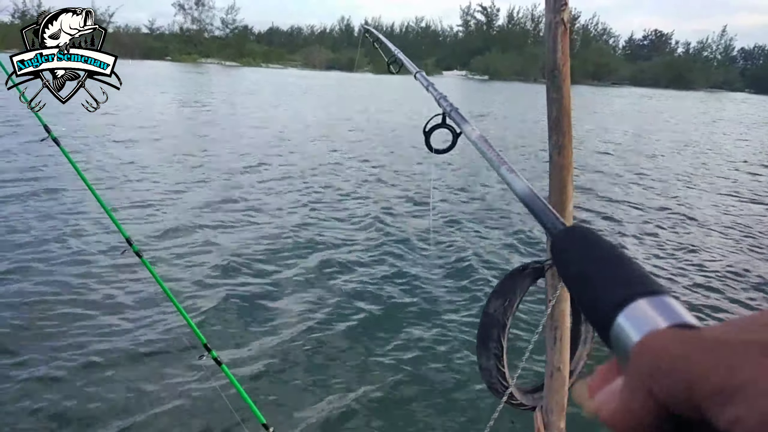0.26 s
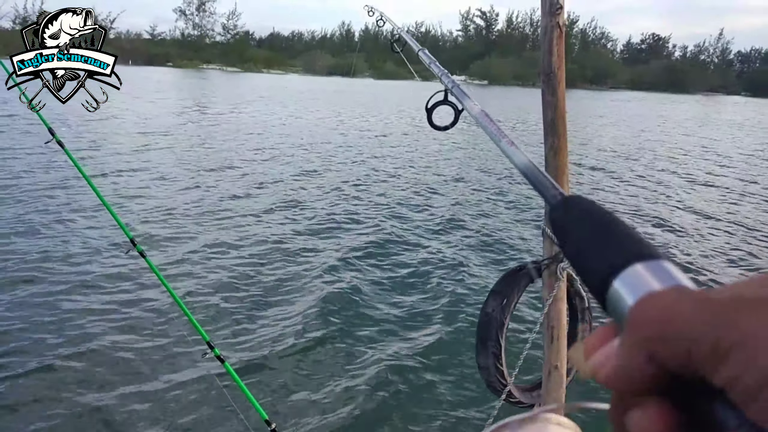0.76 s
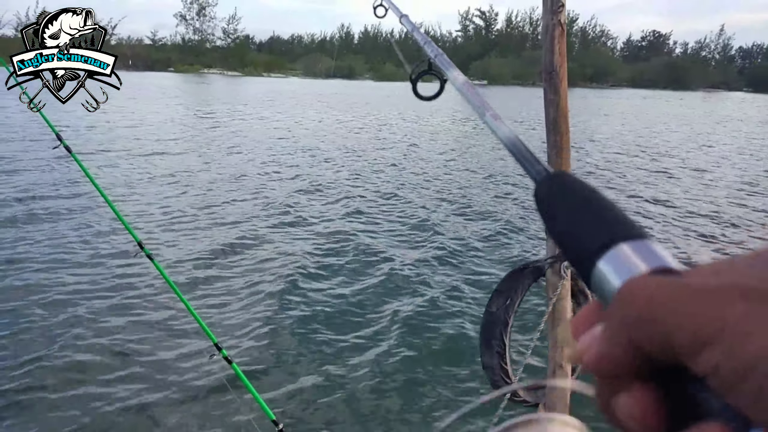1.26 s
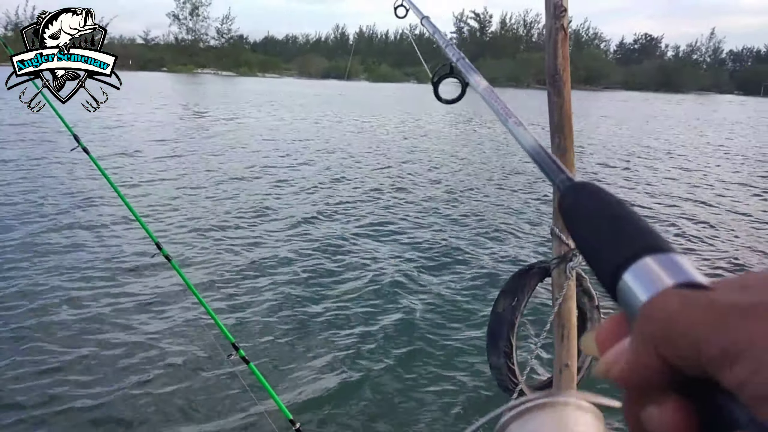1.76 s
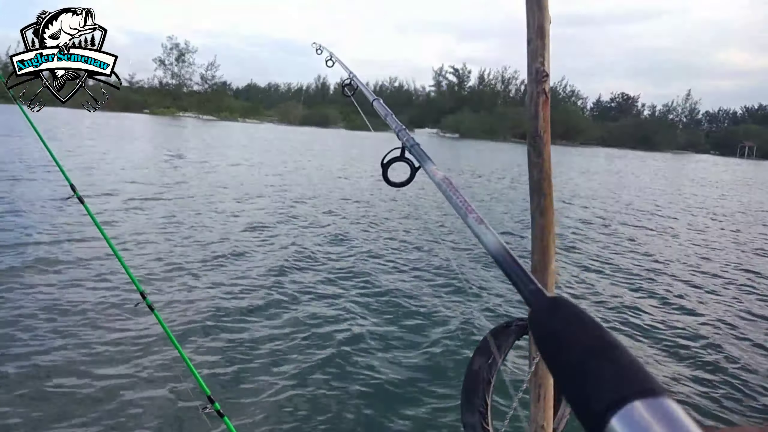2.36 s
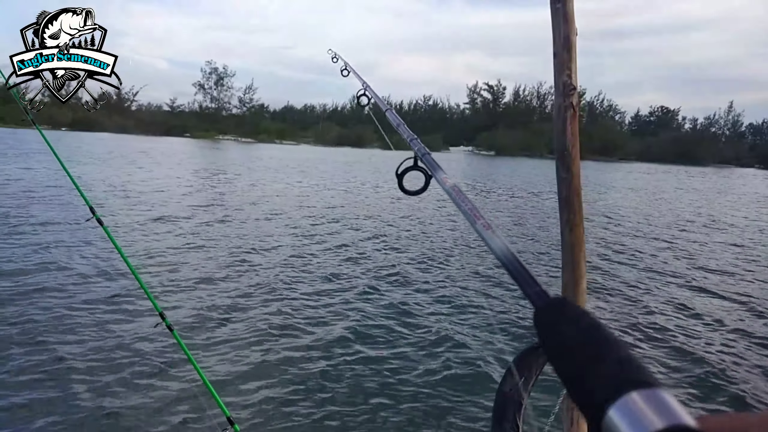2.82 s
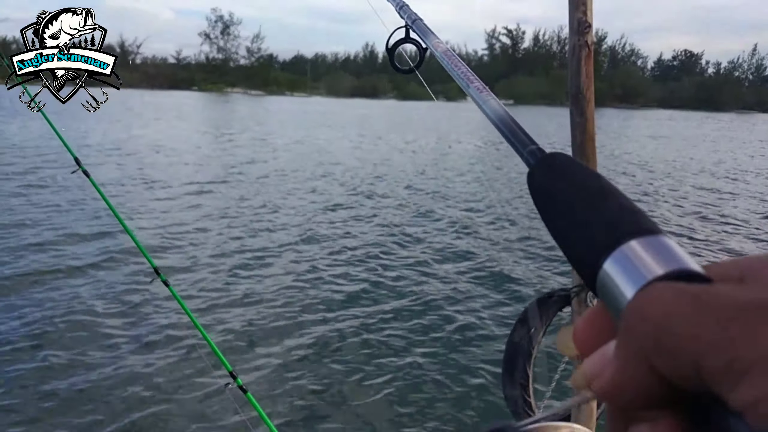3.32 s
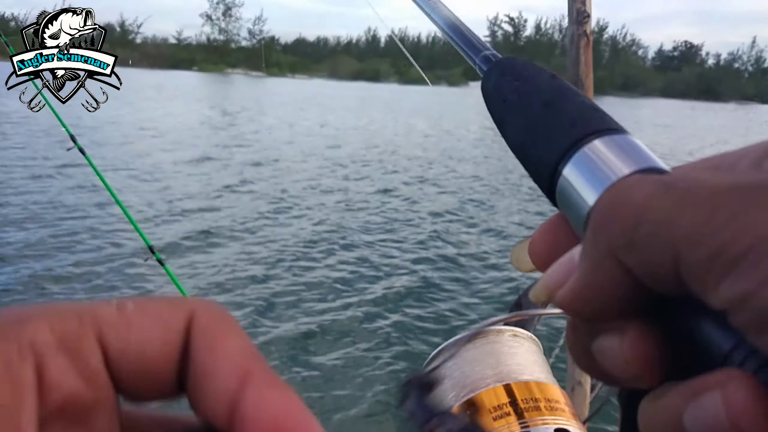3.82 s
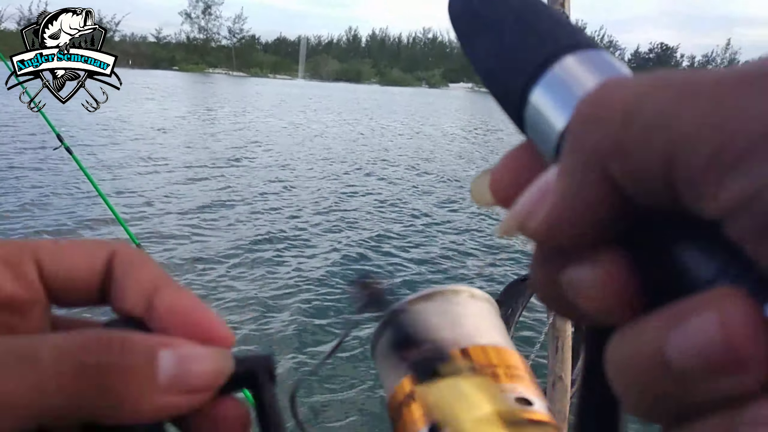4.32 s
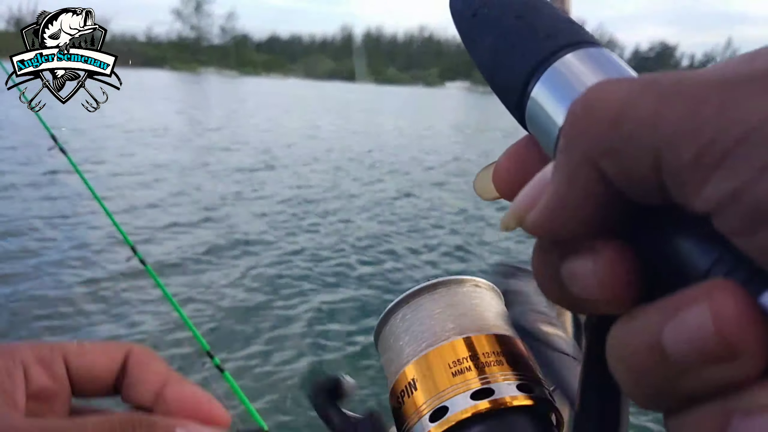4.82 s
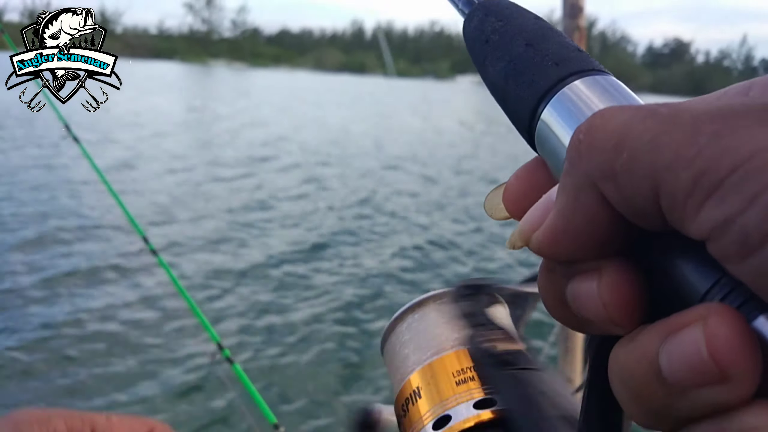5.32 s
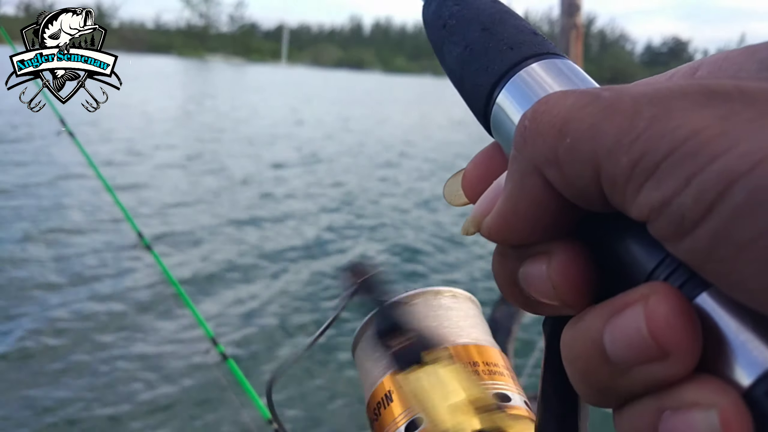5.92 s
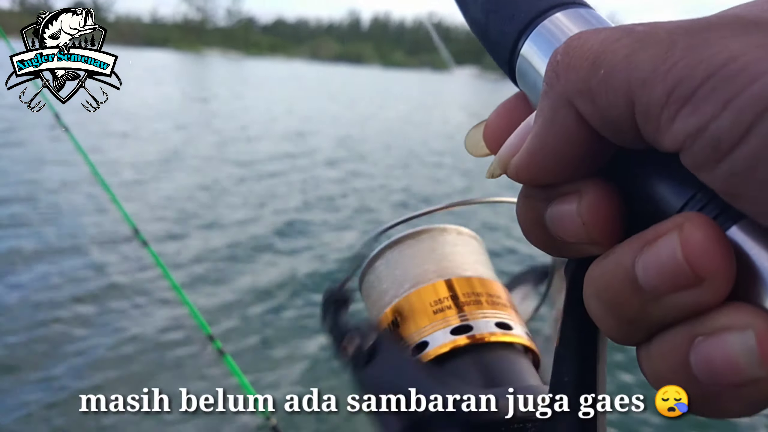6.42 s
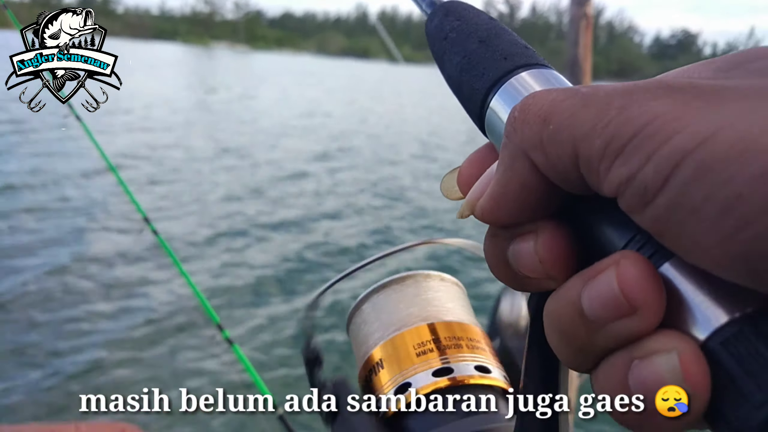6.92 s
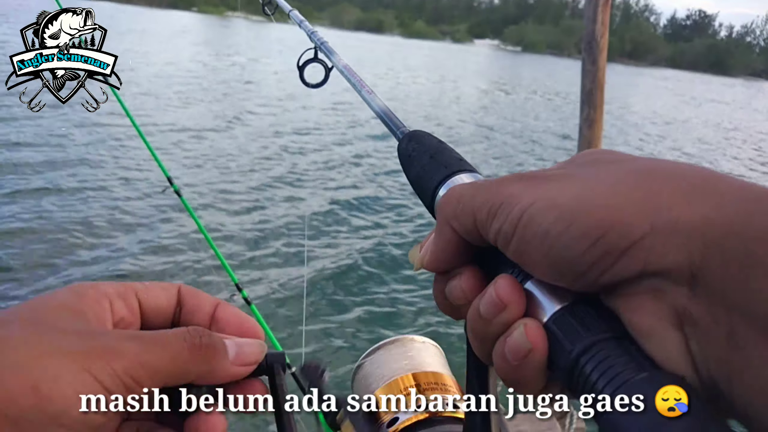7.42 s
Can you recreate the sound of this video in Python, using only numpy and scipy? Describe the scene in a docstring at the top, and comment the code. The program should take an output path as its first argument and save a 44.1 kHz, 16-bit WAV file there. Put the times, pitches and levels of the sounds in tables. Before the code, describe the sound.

An angler winds a spinning reel close to a stereo microphone outdoors. The gears give a soft, narrow whir that swells twice per crank turn, about one turn a second, with sharp irregular ticks and thin line rasp. Wind thuds low, mostly on the right. Small waves hiss below, a few bubbles plop, and faint arched whistles come from afar in the later part. The whir weakens near the end.

```python
"""A spinning reel is wound by an angler on a wooden jetty in a breeze, close to a two-port microphone.
Its gears whir (narrow noise) with a push and a return per crank turn; line and rotor tick and rasp (struck modes).
Wind buffets the right port most: lumpy low noise and decaying low knocks.
Small waves wash below (coloured hiss, droplets) and trapped bubbles plop (gliding, decaying sines).
Faint arched whistles come from afar: hoarse tones sliding up and down."""
import sys
import numpy as np
from scipy import signal
from scipy.fft import rfft, irfft, next_fast_len
from scipy.io import wavfile
from scipy.ndimage import uniform_filter1d

SR = 44100
rng = np.random.default_rng(int(sys.argv[2]) if len(sys.argv) > 2 else 0)


def generate_wav(signal):
    """Clip the signal to [-1, 1] and save it as 16-bit WAV at the path in sys.argv[1]."""
    frames = np.transpose(np.atleast_2d(signal))
    scaled = np.clip(frames, -1, 1) * 32767
    pcm = np.round(scaled).astype(np.int16)
    wavfile.write(sys.argv[1], SR, pcm)


N = 338335

# modes of the reel: [f/Hz, relative left level/dB, relative right level/dB, t60/s]
MODES = [(2950, -9.5, -7, 0.004), (4013, -11.5, -10, 0.0087), (4550, -7, -8, 0.0021),
         (5740, -5, -5, 0.0044), (7200, -10.5, -8.5, 0.0048), (8470, 0.5, 3, 0.0031),
         (9870, 10.5, 4.5, 0.00092), (12060, 0.5, -11, 0.0026), (14400, -5.5, -18, 0.0017)]
HISS_TOP_HZ = 15600


def reel():
    """Whir, rasp and ticks add; scuffs of line over the roller swell the rubbing power."""
    # clear ticks of line and rotor: [t/s, left peak level/dB, brightest f/Hz, left over right beyond 14 dB/dB]
    clear_ticks = [(0.1431, -39, 9500, 3), (0.158, -32, 6000, 0), (0.232, -19.5, 11700, -6),
                   (0.245, -33, 10000, 0), (0.4314, -35, 12000, 2), (0.571, -24, 9000, -10),
                   (0.5882, -20.5, 8400, -4), (0.633, -33, 11000, -5), (0.6734, -28, 11500, 0),
                   (0.855, -26, 9700, 0), (1.044, -30, 12000, 3), (1.0562, -17.5, 11200, -7),
                   (1.0886, -22, 9200, 3), (1.1308, -30, 10300, 6), (1.1613, -30, 11400, 6),
                   (1.2065, -26, 10200, -10), (1.2569, -22.5, 10300, -9), (1.441, -33, 8000, 0),
                   (1.5758, -28, 9400, 2), (1.644, -29, 10500, 4), (1.6789, -21.5, 7940, -11),
                   (1.7764, -15, 11200, -6), (1.979, -29, 12000, 3), (2.064, -28, 9650, -23),
                   (2.077, -10, 9200, 15), (2.085, -27, 10500, 4), (2.251, -39, 9500, 3),
                   (2.26, -22, 10200, 8), (2.292, -25, 10700, 17), (2.376, -32, 11500, 4),
                   (2.391, -32, 11700, -3), (2.431, -39, 10500, 3), (2.463, -22, 9800, -7),
                   (2.5167, -25, 9000, 2), (2.5652, -26.5, 8950, -9), (2.612, -27.5, 10500, 3),
                   (2.62, -33, 8000, 1), (2.6878, -30, 9100, 0), (2.697, -37, 10500, 3),
                   (2.9622, -26.5, 8900, 1), (3.0619, -28, 11500, 0), (3.0864, -28.5, 9500, 3),
                   (3.1858, -13.5, 11100, -7), (3.1986, -27, 9300, 11), (3.2764, -25.5, 10000, -7),
                   (3.2929, -26.5, 9700, 4), (3.355, -23.5, 9800, -8), (3.568, -24.5, 8600, 10),
                   (3.581, -24, 7600, 8), (3.6518, -15, 9700, -10), (3.753, -28, 9300, -2),
                   (3.9199, -25, 10300, -7), (4.0469, -17, 10200, -4), (4.0535, -29, 9500, 3),
                   (4.0625, -26, 9500, 3), (4.2011, -26, 4340, -19), (4.2188, -25.5, 11200, 0),
                   (4.383, -36, 10500, 3), (4.391, -20, 9500, 2), (4.4115, -27, 7000, 10),
                   (4.4169, -23, 9000, 6), (4.482, -28, 12100, 0), (4.5117, -16.5, 10400, 1),
                   (4.5244, -16, 9700, -4), (4.6065, -13, 11600, -5), (4.6175, -35, 9800, 4),
                   (4.672, -21, 9900, -9), (4.6957, -33, 10400, 5), (4.7235, -22.5, 9350, 15),
                   (4.8075, -27, 7600, 2), (4.867, -26, 9800, 7), (4.905, -29, 10400, 14),
                   (4.968, -11.5, 10100, -7), (4.9906, -13, 11180, 1), (5.036, -27, 11000, 0),
                   (5.0458, -23.5, 5100, 19), (5.0975, -24, 4100, 20), (5.2395, -30, 9950, 3),
                   (5.2547, -21.5, 11200, -4), (5.304, -25, 8900, -4), (5.3446, -14, 10600, -5),
                   (5.3676, -17.5, 10000, 3), (5.5707, -28, 9000, -24), (5.6123, -22.5, 10900, 18),
                   (5.8282, -14.5, 11900, -7), (5.897, -29, 8100, 6), (6.0997, -26, 10000, 4),
                   (6.1186, -29, 4330, -14), (6.1253, -20.5, 9400, 11), (6.1318, -20.5, 10500, 6),
                   (6.153, -31, 9500, 2), (6.2159, -26.5, 9100, 11), (6.2335, -24.5, 9900, -13),
                   (6.316, -25, 9650, -4), (6.329, -30, 12000, 4), (6.3503, -11, 10600, 4),
                   (6.417, -32, 11000, 1), (6.4377, -12.5, 9400, 19), (6.4398, -19, 9500, -3),
                   (6.6453, -30, 10600, 6), (6.6767, -32, 9500, 5), (6.7971, -11, 8900, 9),
                   (6.823, -22, 9450, 7), (6.9686, -37, 11500, 7), (7.001, -23, 10600, 4),
                   (7.259, -23, 9800, 17), (7.3453, -28, 10200, 9), (7.3584, -24, 12000, -1),
                   (7.4733, -21.5, 9600, 15), (7.4891, -35, 8650, -11)]
    # steady rubbing drive: [t/s, hiss in the body level/dB, rasp of the line level/dB]
    rubbing_drive = [(0, -63.5, -65.5), (0.3, -66.5, -69.5), (0.37, -63, -64.5), (0.78, -60.5, -62),
                     (0.92, -67, -64.5), (1.15, -59.5, -58.5), (1.4, -64.5, -66), (2.1, -63.5, -65),
                     (2.75, -67, -68), (3.5, -61, -60.5), (4.2, -60.5, -57), (5.0, -61, -61.5),
                     (5.6, -64, -67), (5.95, -59.5, -62), (6.15, -64.5, -67), (6.36, -60, -61),
                     (6.55, -66.5, -71.5), (6.8, -60, -69.5), (6.95, -65, -64), (7.15, -67.5, -67),
                     (7.67, -66, -61)]
    # short scuffs: [centre t/s, level/dB]
    scuff_rows = [(.03, -57), (.14, -51), (0.228, -60), (0.768, -58), (1.08, -53.5), (1.45, -59),
                  (1.569, -53), (1.67, -55.5), (1.962, -57.5), (2.071, -54.5), (2.48, -58.5),
                  (2.612, -57.5), (3.06, -54.5), (3.178, -54), (3.93, -60), (4.041, -54.5), (4.4, -49.5),
                  (4.89, -57), (5.261, -53), (5.37, -52.5), (5.582, -60.5), (5.788, -56.5), (5.9, -57),
                  (6.24, -55), (6.331, -50), (6.438, -54), (6.569, -59), (6.66, -59.5), (6.8, -51),
                  (7.49, -57.5)]
    scuff_half_width_s, scuff_in_body_db = 0.016, -12

    body_db, line_db = in_time(rubbing_drive)
    scuff_power = bumps(*np.transpose(scuff_rows), scuff_half_width_s)
    body_power = from_db(2 * body_db) + from_db(2 * scuff_in_body_db) * scuff_power
    line_power = from_db(2 * line_db) + scuff_power
    body_db, line_db = 10 * np.log10(body_power), 10 * np.log10(line_power)
    faint_ticks = ticks(strays(line_db, count=330))
    rubbing = patchy(rasp(body_db, line_db) + faint_ticks)
    return whir(*crank()) + rubbing + ticks(clear_ticks)


def crank():
    """Each turn has a fast push and a slower return; gives the whir's pitch (Hz) and level (dB)."""
    # turns of the crank: [push t/s, push level/dB, return level/dB]
    turns = [(-0.27, -67, -61), (0.72, -56.5, -58.5), (1.632, -54.5, -58.5), (2.65, -59, -59.5),
             (3.662, -54.5, -58), (4.64, -53.5, -58.5), (5.501, -55, -59), (6.501, -58.5, -68),
             (6.833, -62.5, -88), (7.449, -64, -84)]
    push_half_width_s, return_half_width_s, speed_up_half_width_s = 0.18, 0.19, 0.22
    return_share = 0.39  # how far into the turn the return comes
    slow_hz, push_rise_hz, coast_db = 1571, 94.4, -86

    push_s, push_db, return_db = np.transpose(turns)
    turn_s = np.diff(push_s)
    return_s = push_s + return_share * np.append(turn_s, turn_s[-1])
    power = bumps(push_s, push_db, push_half_width_s)
    power = power + bumps(return_s, return_db, return_half_width_s) + from_db(2 * coast_db)
    pitch_hz = slow_hz + push_rise_hz * bumps(push_s, 0 * push_db, speed_up_half_width_s)
    return pitch_hz, 10 * np.log10(power)


def whir(hz, level_db):
    """Gear teeth rub: a narrow band of uneven noise whose centre rises as the crank speeds up."""
    wander_hz = 28
    turning = np.exp(2j * np.pi * np.cumsum(hz + wander_hz * drift(9.15)) / SR)
    flutter_db = 3.2 * drift(20)
    shared = wobble(95)
    left, right = [rms_one((turning * (shared + .45 * wobble(140))).real) for port in range(2)]
    return from_db(level_db + flutter_db) * ports(left, right)


def rasp(body_db, rasp_db):
    """Dense rubbing keeps the modes ringing in patches; those of the gear housing wander in pitch."""
    body_top_hz = 7500  # modes below belong to the gear housing
    pitch_wander = 0.015  # fraction
    out, t = np.zeros((2, N)), np.arange(N) / SR
    rubbing = .5 * rms_one(grains(1500, 4.5)) + .9 * rng.standard_normal((2, N))
    catching_db = 2.5 * drift(45)  # the line catches and slips
    for hz, left_db, right_db, t60_s in MODES:
        in_body = hz < body_top_hz
        drive_db = body_db - 2.5 if in_body else rasp_db - 12.5
        patches_db = 1.5 * drift(25) + catching_db
        rung = ring(from_db(drive_db + patches_db) * rubbing, hz, t60_s)
        warped_t = t - np.cumsum(pitch_wander * drift(6)) / SR * in_body
        out += from_db([[left_db], [right_db]]) * [np.interp(warped_t, t, port) for port in rung]
    high_pass = signal.butter(4, 2100, "high", fs=SR, output="sos")
    return ports(*signal.sosfilt(high_pass, out))


def ticks(rows):
    """A short scatter of touches strikes the modes near its colour; a tiny contact radiates no lows."""
    contact_t20_s = 0.0007
    hz, left_db, right_db, t60_s = np.transpose(MODES)[:, :, None]
    out, t = np.zeros((2, N)), np.arange(round(0.013 * SR)) / SR
    modes = from_db(-60 * t / t60_s) * np.sin(2 * np.pi * hz * t)
    port_db = np.hstack([left_db, right_db]).T
    for s, level_db, bright_hz, pan_db in rows:
        near_db = -12.0 * np.log2(hz[:, 0] / bright_hz) ** 2
        blow_db = port_db + near_db + rng.normal(0, 2.65, (2, len(hz)))
        blows = from_db(blow_db) * rng.choice([-1, 1], len(hz))
        touches = (rng.standard_normal(len(t)) ** 3 * from_db(-20 * t / contact_t20_s))[:160]
        struck = signal.lfilter(touches, 1, blows @ modes)
        band = signal.butter(3, [.68 * bright_hz, HISS_TOP_HZ], "band", fs=SR, output="sos")
        tick = signal.sosfilt(band, struck)
        tick /= np.abs(tick).max(axis=1, keepdims=True)
        i = min(round(s * SR), N - len(t))
        out[:, i:i + len(t)] += from_db([[level_db], [level_db - pan_db - 14.0]]) * tick
    return ports(*out)


def strays(line_db, count):
    """Rows of faint ticks of every colour, bunched where the line rasps hardest."""
    base_db, spread_db, clump_db = -42, 4, 5.0
    chance = np.cumsum(from_db(line_db + clump_db * drift(25)))
    when, size, hue, side = rng.random((count, 4)).T
    s = np.searchsorted(chance / chance[-1], when) / SR
    level_db = base_db - spread_db * np.log(0.033 + size)
    bright_hz = 6500 + 7000 * hue
    pan_db = 3.1 + 50.0 * (side - .5)
    return np.transpose([s, level_db, bright_hz, pan_db])


def ports(left, right):
    """The reel is nearer the right port, so its sound reaches the left a little late."""
    left_lag_s = .00018
    return np.array([np.roll(left, round(left_lag_s * SR)), right])


def wind():
    """Eddies press on each port on their own: lumpy low noise and short pressure knocks."""
    # wind at the ports: [t/s, left level/dB, right level/dB]
    port_levels = [(0, -56, -35), (0.9, -54, -37), (1.4, -56.5, -40), (2.45, -52, -42), (2.8, -59.5, -38.5),
                   (3.3, -53, -38.5), (3.55, -51, -42.5), (4.4, -53, -40.5), (5.1, -51.5, -41.5),
                   (5.9, -54, -39), (6.2, -52, -40), (7.0, -54.5, -41.5), (7.35, -57, -40),
                   (7.67, -54, -41)]
    # strongest buffets: [t/s, drive level/dB, port (0 left, 1 right)]
    buffets = [(0.026, -32, 1), (0.087, -19.5, 1), (0.408, -23, 1), (0.451, -22, 1), (0.531, -24, 1),
               (0.682, -22, 1), (0.858, -19.5, 1), (0.986, -20.5, 1), (2.562, -24.5, 1), (3.3, -21, 1),
               (4.426, -22.5, 1), (4.472, -20, 1), (4.622, -14.5, 0), (4.636, -21, 0), (4.891, -18.5, 1),
               (5.518, -22, 1), (5.565, -24, 1), (5.705, -24, 1), (5.882, -22, 1), (5.948, -21, 1),
               (6.59, -21.5, 1), (6.9, -21, 1), (7.161, -23, 1), (7.258, -31, 1), (7.524, -18.5, 1),
               (7.606, -23.5, 1)]
    # wind spectrum: [f/Hz, relative left level/dB, relative right level/dB]
    spectrum = np.array([(30, -42, -21), (61, -19, -28.5), (115, 1, -14), (179, 10.5, -1), (219, 2, 0.5),
                         (293, 9.5, -6.5), (416, -4.5, -13.5), (756, -3.5, -26.5), (1070, -67, -46),
                         (2500, -51, -81)])

    out = np.zeros((2, N))
    for port, level_db in enumerate(in_time(port_levels)):
        lumps_db = 3.36 * drift(8.3) + 0.15 * drift(2.1)
        eddies = rng.standard_normal(N) * from_db(lumps_db) + 5.75 * grains(110, 3.94)
        out[port] = from_db(level_db) * colour(eddies, spectrum[:, [0, 1 + port]])
    t = np.arange(round(.05 * SR)) / SR
    swell = (t / 0.01) ** 2 * np.exp(2 - 2 * t / 0.0066)
    for (s, level_db, port), (pitch, phase) in zip(buffets, rng.random((len(buffets), 2))):
        cycles = (190 + 50 * pitch) * t + phase
        knock = np.sin(2 * np.pi * cycles) + 0.52 * np.sin(2 * np.pi * 1.458 * cycles)
        i = round(s * SR)
        out[round(port), i:i + len(t)] += (from_db(level_db) * swell * knock)[:N - i]
    return signal.sosfilt(signal.butter(2, 70, "high", fs=SR, output="sos"), out)


def water():
    """Wash and faint small bubbles, plus louder plops: decaying sines, many gliding in pitch."""
    # bubbles and slaps under the planks, and at 4.63 s the low body of a wind knock on the left port: [t/s,
    # level/dB, f/Hz, t60/s, relative pitch rise/(1/s)]
    plop_rows = [(1.195, -31.5, 1020, 0.005, 0), (1.243, -33, 990, 0.031, 0), (4.337, -33, 656, 0.07, 2.5),
                 (4.41, -29, 970, 0.022, -1), (4.63, -27, 374, 0.033, -5), (5.252, -26.5, 855, 0.0033, 0),
                 (6.264, -33.5, 665, 0.016, 3), (7.235, -37, 740, 0.017, -1), (7.244, -24.5, 470, 0.01, -7),
                 (7.258, -32, 595, 0.015, -4), (7.259, -31, 1100, 0.0065, 0),
                 (7.258, -35.5, 309.7, 0.25, 2.5), (7.266, -41.5, 1300, 0.03, -12),
                 (7.349, -50, 870, 0.029, -2), (7.36, -47, 597, 0.18, 1), (7.548, -34, 503, 0.037, -5)]
    small = sum(ring(grains(3.0, 4.0), hz, 14.0 / hz) for hz in np.geomspace(400, 2400, 10))
    plops = small * from_db(-60)
    t = np.arange(round(.11 * SR)) / SR
    uneven = from_db(3.5 * drift(90))  # a bubble in moving water does not ring evenly
    for s, level_db, hz, t60_s, rise in plop_rows:
        i = round(s * SR)
        attack = np.minimum(t / min(.12 * t60_s, .004), 1)
        shape = from_db(level_db - 60 * t / t60_s) * attack * uneven[i:][:len(t)]
        tone = np.sin(2 * np.pi * hz * (t + rise * t * t / 2))
        plops[i:i + len(t)] += (shape * tone)[:N - i]
    return wash() + plops


def wash():
    """Hiss and droplets, partly alike at both ports, swelling slowly."""
    # wash spectrum: [f/Hz, relative level/dB]
    spectrum = [(200, -21), (450, 5.5), (750, -1.5), (1100, -2.5), (2000, -6), (3500, -29.5), (7000, -7),
                (12600, -10), (13200, -14), (15500, -18)]
    # course of the wash: [t/s, level/dB]
    course = [(0, -58), (6.0, -56.5), (7.67, -64)]
    swell_db, droplet_share, alike = 1.5, 0.7, 0.55  # alike: power share of mid
    mid, side = rng.standard_normal((2, N)) + droplet_share * rms_one(grains(900, 4.1))
    out = np.sqrt(alike) * mid + np.sqrt(1 - alike) * side * [[1], [-1]]
    level_db = in_time(course)[0] + swell_db * drift(4.5)
    return from_db(level_db) * patchy(colour(out, spectrum))


def whistles():
    """Each note slides up and down again in about a tenth of a second, hoarse and broken."""
    # faint arched notes: [centre t/s, level/dB, top f/Hz]
    notes = [(5.06, -57, 2660), (5.35, -60, 2620), (5.63, -57.5, 2570), (5.93, -60.5, 2490),
             (6.25, -58, 2420), (6.6, -61, 2510), (6.95, -59.5, 2550), (7.32, -61, 2590)]
    out, arch = np.zeros(N, complex), np.linspace(-1, 1, round(.13 * SR))
    for s, level_db, top_hz in notes:
        phase = 2 * np.pi * np.cumsum(top_hz * (1 - .2 * arch ** 2)) / SR
        note = np.exp(1j * phase) * np.sqrt(1 - arch ** 2)
        i = round(s * SR) - len(arch) // 2
        out[i:i + len(arch)] += from_db(level_db) * note
    hoarse = (.4 + .6 * wobble(140)) * from_db(3 * drift(40) - 1)
    return (out * hoarse).real * from_db([[-3.0], [0]])


def from_db(db):
    """Decibels to amplitude gain."""
    return 10 ** (np.asarray(db) / 20)


def rms_one(x):
    """Scale to unit rms."""
    return x / np.sqrt(np.mean(x ** 2) + 1e-20)


def in_time(rows):
    """Columns of a curve table, interpolated to one value per sample."""
    s, *columns = np.transpose(rows)
    return [np.interp(np.arange(N) / SR, s, c) for c in columns]


def bumps(times_s, levels_db, half_width_s):
    """Summed power of bell-shaped swells at the given times."""
    t = np.arange(N) / SR
    return sum(from_db(2 * db) * np.exp(-((t - s) / half_width_s) ** 2)
               for s, db in zip(times_s, levels_db))


def colour(x, points):
    """Filter by an (f/Hz, level/dB) curve, interpolated over log frequency; rms 1."""
    hz, db = np.transpose(points)
    size = next_fast_len(N)
    grid_hz = np.maximum(np.arange(size // 2 + 1) * SR / size, 1)
    gain = from_db(np.interp(np.log(grid_hz), np.log(hz), db))
    return rms_one(irfft(rfft(x, size) * gain, size)[..., :N])


def drift(rate_hz):
    """Slow random curve of rms 1: two-pole low-passed noise, made at SR / 20."""
    r = np.exp(-40 * np.pi * rate_hz / SR)
    noise = rng.standard_normal(N // 20 + 4002)
    slow = signal.lfilter([1], [1, -2 * r, r * r], noise)[4000:]  # settled part
    return np.interp(np.arange(N) / 20, np.arange(len(slow)), rms_one(slow))


def wobble(rate_hz):
    """Complex drift: widens a line into a narrow band of noise."""
    return drift(rate_hz) + 1j * drift(rate_hz)


def grains(per_s, spread_db):
    """Random clicks of either sign, a few much larger than the rest."""
    sizes = from_db(spread_db * np.minimum(rng.exponential(1, N), 4)) * rng.choice([-1, 1], N)
    return sizes * (rng.random(N) < per_s / SR)


def ring(clicks, hz, t60_s):
    """Two-pole resonator: a unit click sets a decaying sine of height 1 ringing."""
    r, w = from_db(-60 / (t60_s * SR)), 2 * np.pi * hz / SR
    return signal.lfilter([0, np.sin(w)], [1, -2 * r * np.cos(w), r * r], clicks + 1e-18)


def patchy(x):
    """Narrow bands dip and swell on their own, alike at both ports; nothing above the hiss top."""
    depth_db, patch_s, patch_hz = 3.5, 0.035, 260
    hz, s, cells = signal.stft(x, SR, nperseg=512)
    field = rng.standard_normal(cells.shape[1:])
    for axis, size in enumerate([patch_hz / hz[1], patch_s / s[1]]):
        field = uniform_filter1d(field, round(size), axis=axis)
    gain = from_db(depth_db * np.minimum(rms_one(field), 1)) * (hz < HISS_TOP_HZ)[:, None]
    return signal.istft(cells * gain, SR, nperseg=512)[1][:, :N]


def scene():
    """Reel, wind, water and whistles add at the two ports."""
    return reel() + wind() + water() + whistles()


def record(dry):
    """A steep low-pass cuts the top."""
    cutoff_hz = 16800
    return signal.sosfilt(signal.cheby2(20, 60, cutoff_hz, fs=SR, output="sos"), dry)


dry = scene()
out = record(dry)
generate_wav(out)
```